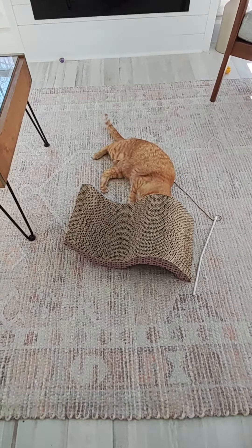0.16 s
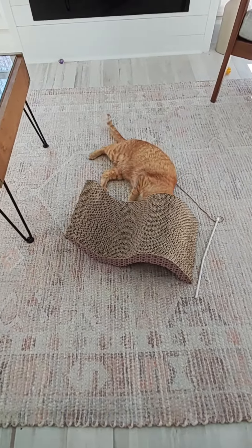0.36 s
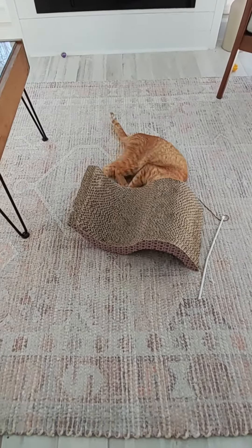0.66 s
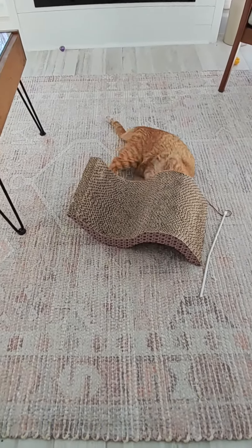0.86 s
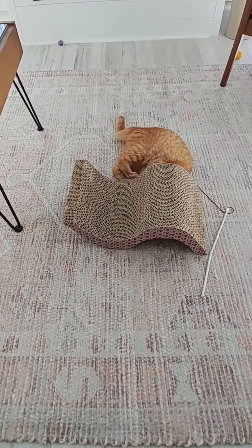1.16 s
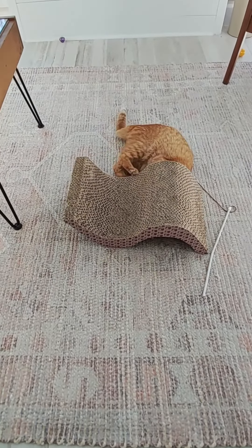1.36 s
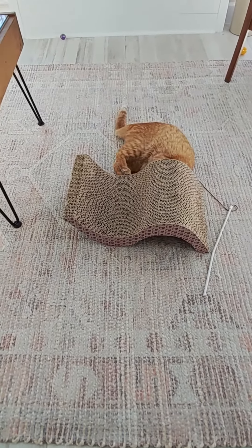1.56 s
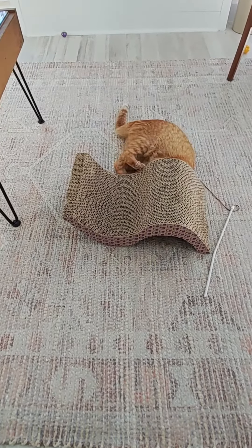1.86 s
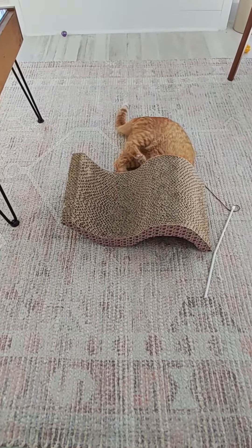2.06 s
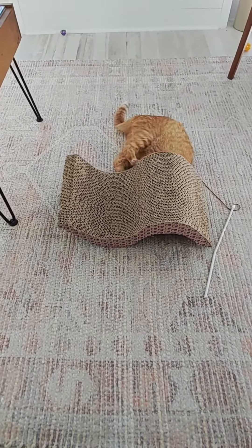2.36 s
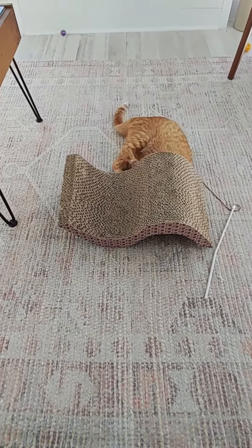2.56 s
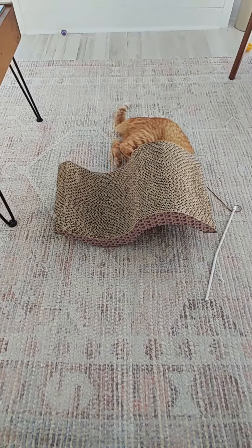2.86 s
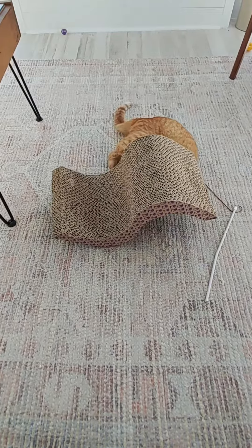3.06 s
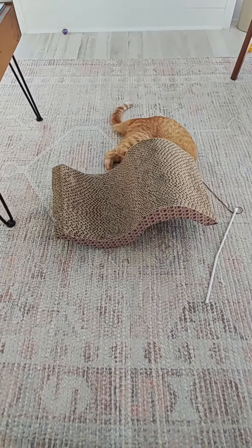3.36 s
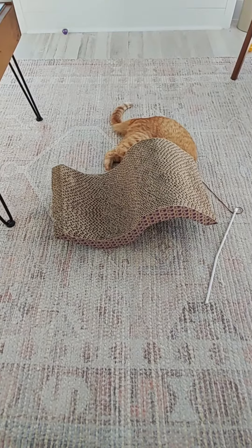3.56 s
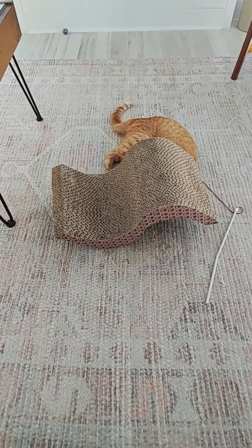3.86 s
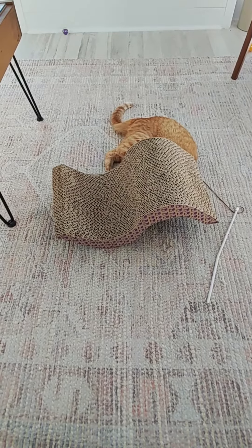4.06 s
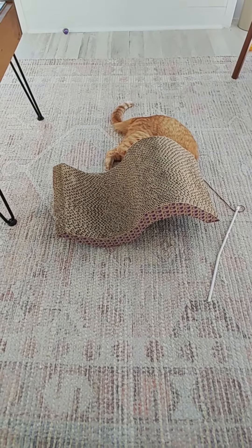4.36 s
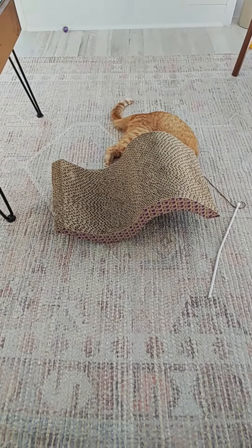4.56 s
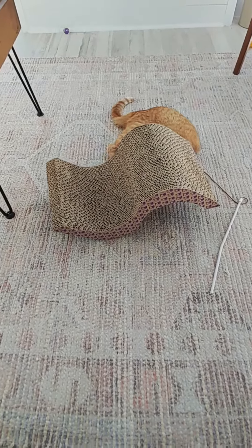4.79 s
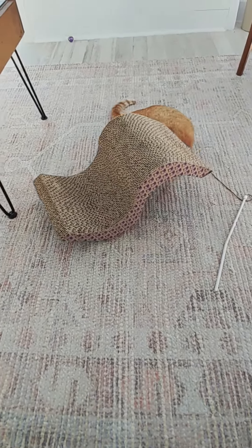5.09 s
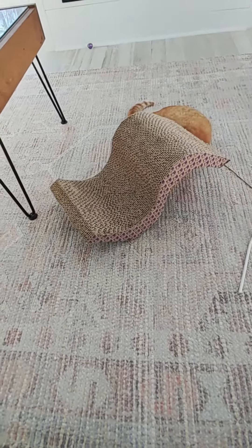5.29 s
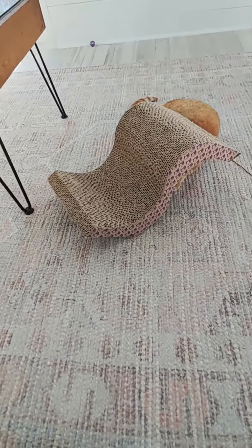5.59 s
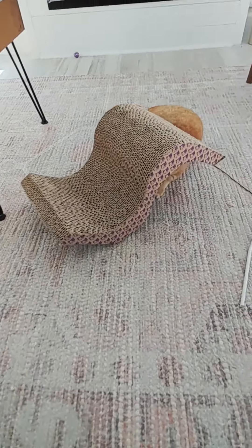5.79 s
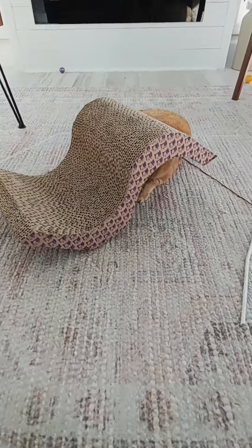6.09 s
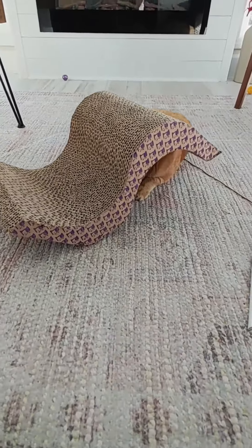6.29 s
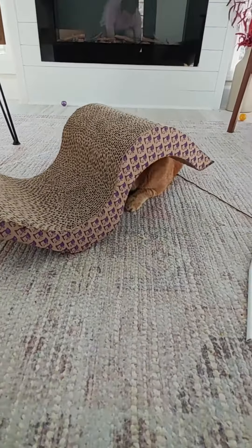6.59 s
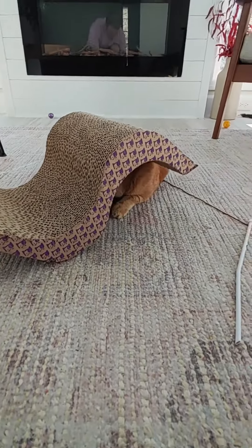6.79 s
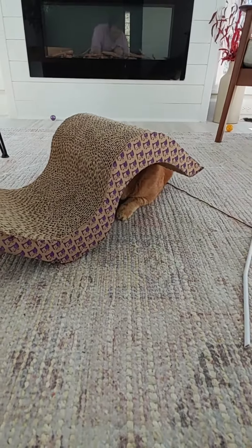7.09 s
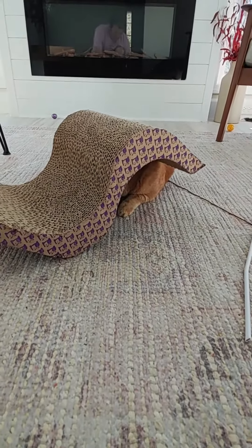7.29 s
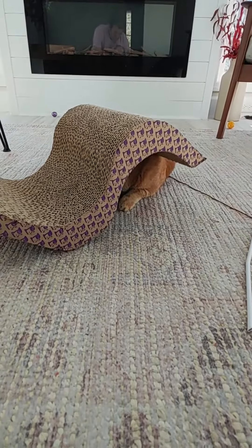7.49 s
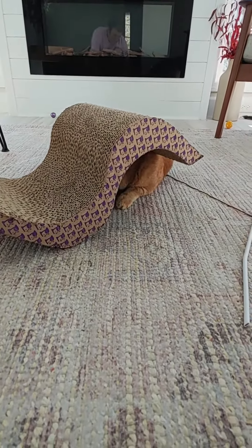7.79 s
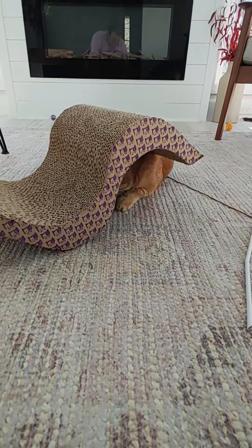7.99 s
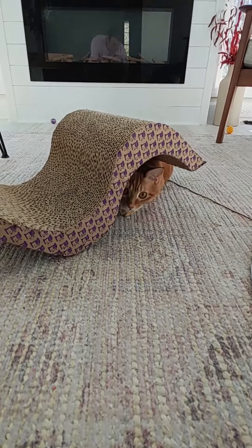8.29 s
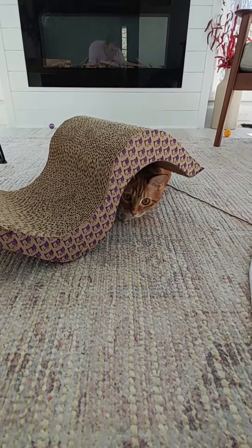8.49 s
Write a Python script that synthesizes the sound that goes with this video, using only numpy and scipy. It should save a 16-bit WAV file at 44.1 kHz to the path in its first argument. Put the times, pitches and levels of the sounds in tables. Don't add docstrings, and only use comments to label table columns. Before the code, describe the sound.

Handheld phone microphone indoors: raspy, papery claw strokes come from a little way off, the strongest around one and two seconds, with snappy ticks and dull board thumps. A lull follows with faint dry clicks. From nearly five seconds, brushing and skin rubs build into a run of loud, short, hollow knocks on the phone shell, ending in soft room hush with one small puff.

```python
import sys
import numpy as np
from scipy import signal
from scipy.fft import rfft, irfft
from scipy.io import wavfile
from scipy.ndimage import uniform_filter1d

SR = 44100
rng = np.random.default_rng(int(sys.argv[2]) if len(sys.argv) > 2 else 0)


def convert_level_to_amplitude(level_db):
    exponent = np.asarray(level_db, float) / 20
    return 10 ** exponent


def persist_wave(psi):
    counts = np.round(np.clip(psi, -1, 1) * 32767).astype(np.int16)
    wavfile.write(sys.argv[1], SR, np.atleast_2d(counts).T)


N = 381465
TIME = np.arange(N) / SR


def level(x, db):
    return x * convert_level_to_amplitude(db) / np.sqrt(np.mean(x ** 2))


def even(x, span_s):
    span = int(span_s * SR)
    power = uniform_filter1d(uniform_filter1d(x ** 2, span), span)
    return x / np.sqrt(power)


def band(x, hz, width):
    hz_in_range = min(hz, .45 * SR)
    return signal.lfilter(*signal.iirpeak(hz_in_range, hz / width, fs=SR), x)


def body(x, peaks):
    out = 0
    for k, (hz, width, db) in enumerate(peaks):
        wide = 1.72 * width
        out = out + (-1) ** k * convert_level_to_amplitude(db) * band(band(x, hz, wide), hz, wide)
    return out


def colour(x, points):
    hz, db = np.transpose(points)
    f = np.maximum(np.arange(N // 2 + 1) * SR / N, 1)
    gain = convert_level_to_amplitude(np.interp(np.log(f), np.log(hz), db))
    return irfft(rfft(x) * gain, N)


def walk(rate):
    k = int(SR / rate)
    steps = np.repeat(rng.standard_normal(N // k + 1), k)
    return uniform_filter1d(uniform_filter1d(steps, k), k)[:N]


def slips(rate, spread_db, patchy_db):
    hit = (rng.random(N) < rate / SR) * np.sign(rng.standard_normal(N))
    size = np.minimum(rng.exponential(size=N), 3)
    return hit * convert_level_to_amplitude(spread_db * size + patchy_db * walk(45))


def swells(rows, tilt=0.):
    shape = 1.365
    power = np.full(N, 1e-12)
    for s, rise, fall, db, *bright in rows:
        before = (s - TIME) / max(rise, .005)
        after = (TIME - s) / max(fall, .005)
        away = np.where(TIME < s, before, after)
        near = away < 3
        power[near] += convert_level_to_amplitude(db + tilt * sum(bright) - 20 * away[near] ** shape) ** 2
    return np.sqrt(power)


def add(out, s, x):
    i = int(s * SR)
    out[i:i + len(x)] += x[:N - i]


def decay(t, t60):
    return np.exp(-np.log(1000) * t / max(t60, .003))


def bursts(rows, snap, edge=0.):
    out, t = np.zeros(N), TIME[:8192]
    noises = rng.standard_normal((len(rows), len(t)))
    for (s, db, hz, t60, share), noise in zip(rows, noises):
        x = noise * (decay(t, t60) + snap * decay(t, 0.005))
        x = x - edge * (t == 0)
        x = band(band(x, hz, share * hz), hz, 1.4 * share * hz)
        add(out, s, convert_level_to_amplitude(db) * x / np.abs(x).max())
    return out


# pitch in Hz, level in dB per Hz.
HUSH_COLOUR = [(15, -21.5), (45, 2.5), (100, -30.5), (200, -22.5), (500, -20.5), (1500, -25.5),
               (4000, -27.5), (7500, -27), (9600, -27), (12000, -27.5), (16000, -31)]


def room_hush():
    hush = level(colour(rng.standard_normal(N), HUSH_COLOUR), -65)
    return hush * convert_level_to_amplitude(0.846 * walk(9))


# pitch in Hz, level in dB.
WHINE_TONE = (14707, -85)


def whine():
    hz, db = WHINE_TONE
    return convert_level_to_amplitude(db) * np.sqrt(2) * np.sin(2 * np.pi * hz * TIME)


# time in seconds, level in dB.
HAND_SWAY = [(0.0, -53), (0.46, -46), (0.67, -58), (0.86, -50), (1.13, -46), (1.5, -55.5), (2.24, -48),
             (2.74, -59.5), (2.89, -44), (3.4, -55.5), (4.4, -53.5), (5.9, -46), (6.33, -40.5),
             (6.45, -48.5), (6.86, -42.5), (7.02, -44), (7.1, -49.5), (8.65, -54.5)]


def phone_sway():
    s, db = np.transpose(HAND_SWAY)
    hand = convert_level_to_amplitude(np.interp(TIME, s, db))
    sway = even(band(band(rng.standard_normal(N), 27., 20.), 28., 40.0), .12)
    return hand * sway * convert_level_to_amplitude(4.5 * walk(11))


# peak in seconds, rise in seconds, fall in seconds, effort in dB.
RUG_LURCHES = [
    (0.25, .8, 0.69, -55),
    (1.1, 0.45, 0.24, -63),
    (2.72, 0.29, 0.46, -57.5),
    (5.23, 0.69, 0.46, -51.5),
    (6.04, 0.37, 0.092, -54.5),
    (6.6, 0.56, 1.1, -63.5),
    (4.4, 0.28, 0.34, -60),
    (7.5, .6, 0.66, -65),
    (1.06, 0.089, .15, -49),
]


def rug_rumble():
    def low(x):
        return even(band(band(x, 68.8, 160.0), 64.0, 290.0), .15)

    bumps = low(slips(rate=220.0, spread_db=4.5, patchy_db=3.0))
    murmur = low(rng.standard_normal(N))
    rest_db = -67
    return swells(RUG_LURCHES) * bumps + convert_level_to_amplitude(rest_db + 2.4 * walk(13)) * murmur


# peak in seconds, rise in seconds, fall in seconds, effort in dB, brightness
# in dB.
SCRAPE_STROKES = [(0.1, 0.11, 0.18, -57.5, 21), (.33, 0.48, 0.28, -53.5, 2), (.53, 0.033, 0.29, -55, 14),
                  (.657, 0.19, 0.16, -46, 9.5), (.77, 0.16, 0.43, -64, 2), (1.01, 0.014, 0.13, -50, 3),
                  (1.07, 0.057, 0.2, -44, 0), (1.24, 0.27, 0.049, -53, -3.5),
                  (1.38, 0.051, 0.38, -66.5, -8.5), (1.78, 0.27, 0.26, -67, 8),
                  (1.83, 0.058, 0.25, -58.5, -0.5), (1.955, 0.072, 0.28, -58.5, -4),
                  (2.115, 0.17, 0.15, -55, 8), (2.155, 0.029, 0.07, -46.5, 13),
                  (2.23, 0.042, 0.15, -61.5, -12), (2.32, 0.16, 0.17, -53.5, -3.5),
                  (2.6, 0.1, 0.59, -58.5, -1), (2.695, 0.016, 0.12, -51, -5.5),
                  (2.75, 0.069, 0.092, -46, -2.5), (2.855, 0.059, 0.075, -57.5, 5),
                  (3.03, 0.46, 0.44, -64.5, 11), (3.08, .06, .06, -64, 18), (3.146, .005, 0.018, -51.5, 7),
                  (3.2, 0.084, 0.055, -62, 11), (3.4, 0.25, 0.19, -67.5, 13),
                  (4.7, 0.23, 0.63, -71.5, 18), (4.92, 0.17, 0.79, -59, 8), (5.115, 0.13, 0.077, -57, -4),
               (5.28, 0.06, 0.11, -59, 6), (5.45, 0.53, 0.16, -74.5, -15), (5.54, 0.043, 0.013, -65.5, -12),
               (5.8, 0.2, 0.069, -61.5, -2), (5.874, 0.15, 0.093, -51, 5), (6.05, .3, 0.96, -70, 16),
               (6.949, 2.5, 0.78, -67.5, 7.5), (8.0, 2.09, 1.9, -78.5, 13)]
# peak in seconds, rise in seconds, fall in seconds, effort in dB.
BOARD_SHOVES = [(.36, 0.163, .3, -63), (.67, 0.14, 0.51, -49.5), (1.01, 0.016, 0.37, -52),
                (1.16, 0.027, 0.076, -57), (1.37, .03, .2, -67), (1.84, 0.078, 0.59, -61),
                (2.17, 0.066, 0.14, -44), (2.24, 0.071, 0.21, -55), (2.7, 0.026, 0.1, -44),
                (2.85, 0.022, 0.1, -51.5), (3.146, 0.014, 0.067, -59), (3.3, 0.63, .8, -78)]
# pitch in Hz, width in Hz, level in dB.
BOARD_RINGS = [(380, 23.6, 3.5), (470, 79, -1), (606, 67, -6.5)]
# pitch in Hz, width in Hz, level in dB.
CELL_RINGS = [(767, 140, 8), (1100, 190, 3), (1458, 330, 0), (1750, 214, 4.5), (2323, 2300, -3.5)]
# pitch in Hz, width in Hz, level in dB.
RIB_RASP = [(3286, 1300, 1), (4124, 760, 4), (5414, 1500, 1.5)]
# pitch in Hz, level in dB per Hz.
FIBRE_HISS = [(3820, -47.5), (6500, -10.5), (7850, -6), (8750, 0), (9370, -0.5), (15000, -8), (16000, -27)]


def scraping():
    efforts = SCRAPE_STROKES
    coarse = slips(rate=900., spread_db=1.0, patchy_db=4.0)
    fine = slips(rate=5000., spread_db=3.8, patchy_db=2.5)
    board = swells(BOARD_SHOVES) * level(body(coarse, BOARD_RINGS), 1.0)
    cells = swells(efforts, tilt=-0.72) * level(body(coarse, CELL_RINGS), 1.64)
    rasp = swells(efforts, tilt=0.01) * level(body(fine + 0.35 * coarse, RIB_RASP), -2)
    hiss = swells(efforts, tilt=0.23) * level(colour(fine + 0.69 * coarse, FIBRE_HISS), 0.083)
    return board + cells + rasp + hiss


# peak in seconds, rise in seconds, fall in seconds, effort in dB.
SKIN_RUBS = [
    (.12, 0.28, 0.31, -48),
    (4.55, 0.086, .02, -61.5),
    (.77, 0.032, 0.28, -47),
    (4.97, 0.11, 0.37, -53),
    (5.1, 0.27, 0.087, -53.5),
    (5.25, 0.09, 0.058, -56),
    (5.396, 0.14, 0.14, -44),
    (5.9, 0.073, 0.12, -57),
    (6.0, 0.039, 0.099, -45.5),
    (6.6, 0.65, 0.32, -72),
]
# pitch in Hz, width in Hz, level in dB.
RUBBED_SHELL_RINGS = [(515, 66.6, 5.5), (660, 150, -3)]


def hand_rubs():
    skin = slips(rate=3000., spread_db=2.2, patchy_db=2.2)
    return swells(SKIN_RUBS) * level(body(skin, RUBBED_SHELL_RINGS), 1.28)


# start in seconds, # peak in
# dB, centre in Hz.
SHARP_TICKS = [(0.1102, -36, 9500), (0.3152, -34, 9510), (0.6175, -40, 4500), (0.8939, -40, 4130),
               (0.911, -44, 4500), (0.995, -34, 3750), (1.708, -48, 1800), (2.1083, -37, 10100),
               (2.8415, -31, 9940), (2.9327, -37, 8840), (3.1514, -37.5, 3700), (4.8653, -33, 4500),
               (4.8836, -40, 9540), (6.1637, -40, 5290), (6.3049, -41, 3550), (6.5818, -35, 3320),
               (6.64, -46, 2800), (6.8518, -36, 7000), (7.0194, -34, 6740), (7.532, -44, 4280),
               (4.9475, -40, 7500), (2.7307, -32, 1700), (0.6524, -30, 6500), (1.0529, -16, 4100),
               (1.138, -18, 5300), (2.146, -27, 1500), (2.146, -27, 5000), (2.1551, -20, 9400),
               (2.7316, -25, 9550), (3.1418, -25, 8400), (4.9051, -22, 10200), (5.5472, -21, 2900),
               (5.5472, -25, 6500), (1.1385, -24, 3000)]


def sharp_ticks():
    rows = [(*tick, .012, .6) for tick in SHARP_TICKS]
    return bursts(rows, snap=2.3, edge=23.0)


# start in seconds, peak in dB, centre in Hz, time to fall 60 dB in seconds,
# width as a share of the centre.
CLAW_SNAGS = [(0.111, -23.5, 1280, 0.021, 0.86), (0.555, -36, 1310, 0.36, 2.1),
              (0.67, -26.5, 1220, 0.15, 0.44), (0.703, -28, 1220, 0.18, 0.59),
              (0.894, -39.5, 1140, 0.12, 0.75), (0.998, -27.5, 965, 0.073, 1.2),
              (1.054, -16, 1620, 0.012, 1.06), (1.06, -36, 4030, 0.6, 0.59),
              (1.068, -34, 1500, 0.021, 0.65), (1.175, -34.5, 4500, 0.043, .4),
              (1.238, -32.5, 3870, 0.072, 0.26), (1.24, -43, 1160, 0.051, 0.35),
              (1.359, -41.5, 1060, 0.55, 0.41), (1.828, -42.5, 1110, 0.35, 0.54),
              (1.95, -41.5, 1050, 0.3, 0.38), (2.226, -42, 1300, .03, 0.72),
              (2.145, -29.5, 780, 0.19, 0.88), (2.684, -30, 1110, 0.11, 1.5),
              (2.695, -30.5, 920, 0.098, 0.35), (2.841, -36.5, 1030, 0.11, 0.39),
              (2.931, -43, 1640, 0.11, 1), (3.143, -51, 880, 0.083, 0.34), (.574, -39, 1720, .04, 0.46),
              (4.84, -36, 990, 0.016, 0.48), (4.866, -37.5, 1500, 0.077, 1.9),
              (5.105, -46.5, 3000, .08, .15), (5.112, -38.5, 1300, .04, 0.64),
              (5.24, -44.5, 1500, 0.068, 1.3), (7.532, -40.5, 1290, 0.036, 2.1)]


def claw_snags():
    return bursts(CLAW_SNAGS, snap=1.8)


# start in seconds, peak in dB, ring in Hz, # crack in dB against the
# peak, jolt in dB.
JOLTING_KNOCKS = [(0.112, -34, 547, -6, -34), (0.22, -25.5, 420, -27, -30), (0.508, -32, 530, -3, -28.5),
                  (2.147, -53, 860, -18, -38), (4.562, -31.5, 660, -6.5, -25.5), (4.839, -35, 660, -24, -29),
                  (5.314, -36, 513, -13, -37.5), (5.478, -30.5, 513, -39, -30.5), (5.516, -30, 470, -13, -30),
                  (5.547, -22.5, 606, 0.5, -27), (5.851, -25, 530, -12, -36), (5.91, -36.5, 694, -0.5, -39.5),
                  (5.989, -45, 526, 0, -34.5), (6.022, -32, 536, -14, -32), (6.061, -26.5, 567, -20, -27),
                  (6.1645, -11.5, 539, -17.5, -28.5), (6.306, -12.5, 562, -20.5, -25.5),
                  (6.582, -7, 560, -22, -24), (6.853, -11, 550, -11.5, -23.5),
                  (7.02, -11.5, 543, -12.5, -24.5)]
# start in seconds, peak in dB, ring in Hz, # crack in dB
PLAIN_KNOCKS = [(0.227, -24, 504, -2.5), (0.749, -23, 470, -20), (0.763, -27.5, 520, -6.5),
                (0.771, -36, 560, -25), (0.787, -30, 460, -20), (0.832, -42, 480, -20),
                (1.14, -18.5, 520, -9), (2.696, -40, 390, 0), (4.77, -45.5, 474, -17),
                (5.161, -34.5, 676, -1.5), (5.659, -41.5, 476, -22), (5.729, -16, 550, -38),
                (5.817, -25.5, 547, -18), (5.929, -44, 544, -19), (5.959, -25.5, 515, -19),
                (5.983, -44, 715, -10), (6.004, -43, 576, -7), (6.042, -17.5, 532, -27),
                (6.081, -20.5, 530, -20), (6.16, -34, 534, -29.5), (6.179, -43, 630, -12.5),
                (6.184, -40, 534, -18.5), (6.262, -51, 533, -24), (6.318, -28, 554, -8),
                (6.327, -35, 563, -15), (6.594, -24, 562, -6), (6.613, -43, 690, -21), (6.623, -36, 547, -19),
                (6.862, -42, 523, -29), (6.817, -34, 660, -8.5), (6.833, -38.5, 850, -2),
                (7.012, -35, 564, -8), (7.054, -55, 514, 9)]
# pitch in Hz, level in dB against the main ring,
# share of the shell's ringing time.
SHELL_SIDE_RINGS = [(690, -17, 1.0), (350, -17, .8), (1500, -36, .4)]
# pitch in Hz, width in Hz, level in dB.
CRACK_RINGS = [(1426, 590, 5), (1980, 680, -1.5), (3100, 1430, -5.5)]


def knocks():
    shell_t60_s, push_s, edge_s = 0.051, .0013, 0.00023
    out, t = np.zeros(N), TIME[:4096]
    push = (1 - np.exp(-t / push_s)) ** 1.92
    bent = t + .3 * .0035 * (1 - np.exp(-t / .0035))
    edge = t / edge_s * np.exp(1 - t / edge_s)
    rows = [*JOLTING_KNOCKS, *PLAIN_KNOCKS]
    noises = rng.standard_normal((len(rows), len(t)))
    for (s, db, hz, crack_db, *_), noise in zip(rows, noises):
        modes = [(0.917 * hz, 0, 0.76), *SHELL_SIDE_RINGS]
        spot = 2 * noise[-len(modes):] * (np.arange(len(modes)) > 0)
        ring = np.zeros(len(t))
        for (f, mode_db, share), vary_db in zip(modes, spot):
            fall = decay(t, share * shell_t60_s) + 4.5 * decay(t, 0.011)
            ring += convert_level_to_amplitude(mode_db + vary_db) * np.sin(2 * np.pi * f * bent) * fall
        ring = push * ring
        crack = body(noise * (decay(t, 0.0055) + 0.058 * decay(t, 0.08)), CRACK_RINGS)
        crack = crack / np.abs(crack).max() + 0.94 * edge
        knock = ring / np.abs(ring).max() + convert_level_to_amplitude(crack_db) * crack
        add(out, s - .0008, -convert_level_to_amplitude(db) * knock)
    return out


# start in seconds, peak in dB, pitch in Hz.
SOFT_THUDS = [(0.288, -41, 73), (0.351, -40.5, 82.5), (0.394, -38.5, 97.5), (0.439, -48, 75),
              (1.053, -36.5, 73), (1.075, -32, 73), (1.137, -18.5, 204), (1.788, -48.5, 96),
              (1.953, -42, 88), (2.254, -37.5, 112), (2.4, -50, 91), (2.5, -53, 90), (2.66, -54, 100),
              (4.342, -48, 123), (5.098, -43.5, 72.5), (5.122, -44, 86), (5.234, -55, 78), (6.191, -36, 73),
              (8.482, -46.5, 99.7)]


def thuds():
    lead_s, jolt_hz = 0.0016, 83.4
    out, t = np.zeros(N), TIME[:8192]
    rise = 1 - np.exp(-(t / .0008) ** 2)
    jolts = [(knock[0] - lead_s, knock[-1], jolt_hz) for knock in JOLTING_KNOCKS]
    for s, db, hz in [*SOFT_THUDS, *jolts]:
        swing = np.cos(2 * np.pi * hz * t) * decay(t, 2.6 / hz) * rise
        add(out, s + lead_s, -convert_level_to_amplitude(db + 8.5) * swing)
    return out


# start in seconds, peak in dB.
SINGLE_CLICKS = [(1.8402, -48), (1.8781, -49), (3.025, -53), (3.299, -45), (3.377, -43), (3.441, -45),
                 (5.7648, -43), (6.0013, -50), (6.2153, -45), (6.8962, -51), (7.1103, -43), (7.191, -46),
                 (7.2982, -44.5), (7.3953, -45)]
# start in seconds, peak in dB, gap to the answer in seconds.
ANSWERED_CLICKS = [(1.479, -46, .0154), (1.5334, -43, 0.0059), (1.636, -42.5, .0128), (1.7385, -43, .0192),
                   (3.479, -46, .015), (4.318, -44.5, .019), (5.43, -46, .016), (7.063, -44.5, 0.0057),
                   (5.484, -45, .0155), (5.598, -48, .0185), (6.136, -45, 0.015), (6.9612, -43, 0.005),
                   (7.487, -47, 0.015), (8.1583, -44.5, 0.018), (8.304, -45, 0.016)]
# pitch in Hz, width in Hz, level in dB.
CLICK_RINGS = [(5330, 1250, -5.5), (7460, 1700, -9.5), (8900, 1400, -7.5)]


def clicks():
    first = [(s, db) for s, db, gap in ANSWERED_CLICKS]
    answer = [(s + gap, db - 0.5) for s, db, gap in ANSWERED_CLICKS]
    every = [*SINGLE_CLICKS, *first, *answer]
    out = np.zeros(N)
    for hz, width, ring_db in CLICK_RINGS:
        rows = [(s, db + ring_db, hz, .006, width / hz) for s, db in every]
        out += bursts(rows, snap=.3, edge=2.7)
    return out


# start in seconds, peak in dB, centre in Hz.
LOOSE_CHATTER = [(5.4449, -56, 1550), (5.9665, -47, 1900), (6.035, -49, 1800), (6.0742, -44, 1600),
                 (6.1766, -37, 1560), (6.184, -44.5, 1160), (6.328, -46, 720), (6.6, -50, 1500),
                 (6.611, -47, 1210), (6.7, -50, 1450), (6.8625, -49, 1650), (7.031, -50.5, 1590),
                 (7.0205, -32, 1450), (6.8525, -42, 3300), (6.3055, -45, 3000), (4.823, -49, 900),
                 (4.85, -45, 1060)]


def chatter():
    return bursts([(*row, .014, .3) for row in LOOSE_CHATTER], snap=0.28)


# start in seconds, peak in dB, centre in Hz,
# time to fall 60 dB in seconds, width as a share of the centre.
HOLLOW_PUFF = [
    (7.532, -45, 2206, 0.015, 0.28),
    (7.532, -48, 6130, .015, .2),
    (7.532, -50.5, 9660, .015, 0.25),
    (7.541, -50, 2140, 0.24, 0.14),
    (7.541, -50, 4100, 0.19, 0.2),
    (7.542, -50, 5600, 0.26, 0.27),
    (7.541, -53.5, 9200, 0.16, 0.14),
]


def puff():
    return bursts(HOLLOW_PUFF, snap=1.8)


def room(x):
    t60_s, tail_db = 0.35, -13.5
    t = TIME[:SR // 2]
    tail = band(rng.standard_normal(len(t)), 1500., 2700.0)
    tail = tail * decay(t, t60_s) * (t > .008)
    tail = tail / np.sqrt(np.sum(tail ** 2))
    return x + convert_level_to_amplitude(tail_db) * signal.fftconvolve(x, tail)[:N]


def scene():
    scratcher = room(scraping() + claw_snags() + puff())
    phone = phone_sway() + hand_rubs() + knocks() + thuds() + clicks() + chatter()
    background = room_hush() + whine() + rug_rumble()
    return (scratcher + sharp_ticks() + phone + background)[None]


def low_pass(x):
    return signal.sosfilt(signal.butter(12, 16810, fs=SR, output="sos"), x)


# pitch in Hz, width in Hz, lift in dB.
MIC_HOLE = (9630, 930, 4.7)


def record(dry):
    hz, width, lift_db = MIC_HOLE
    mic = dry + (convert_level_to_amplitude(lift_db) - 1) * band(dry, hz, width)
    top_cut = signal.ellip(8, .2, 60, 15800, fs=SR, output="sos")
    mic = signal.sosfilt(top_cut, mic)
    return low_pass(mic)


dry = scene()
out = record(dry)
persist_wave(out)
```